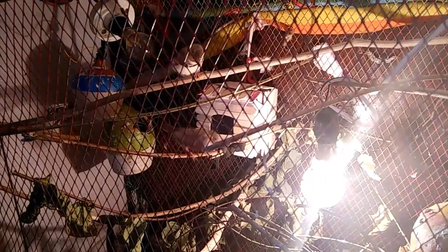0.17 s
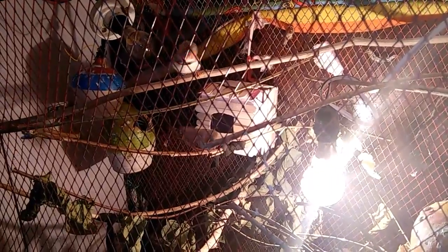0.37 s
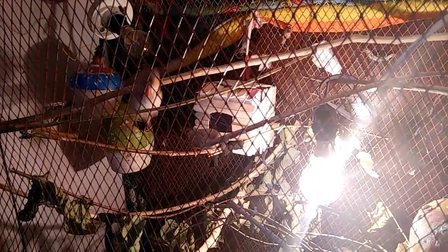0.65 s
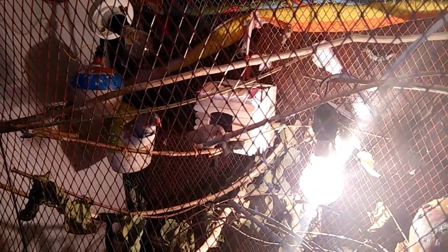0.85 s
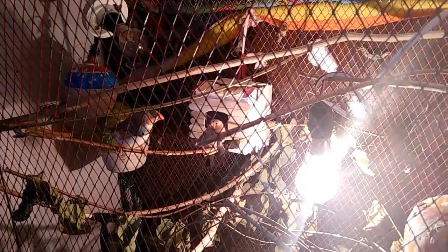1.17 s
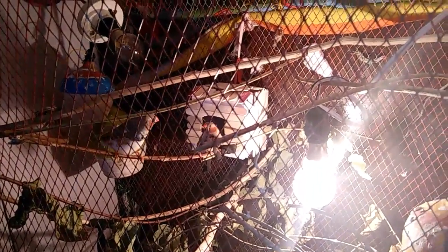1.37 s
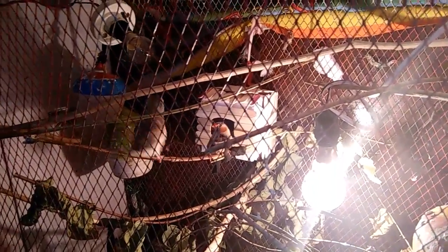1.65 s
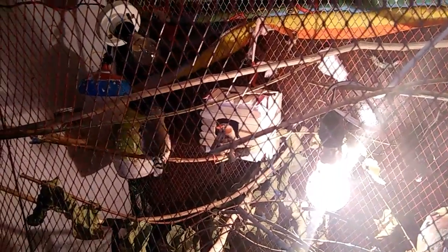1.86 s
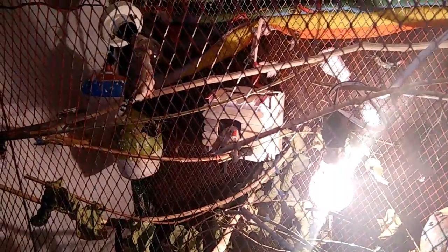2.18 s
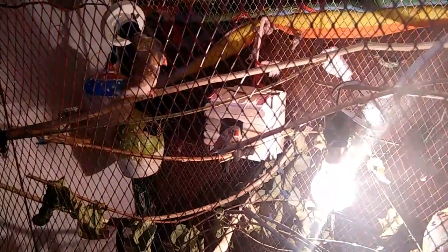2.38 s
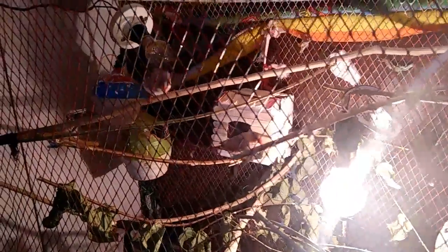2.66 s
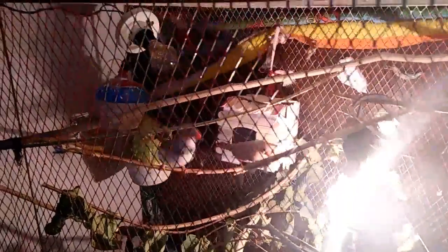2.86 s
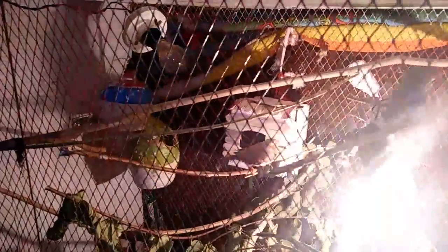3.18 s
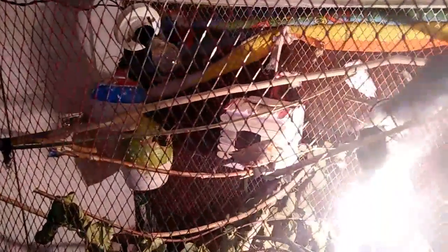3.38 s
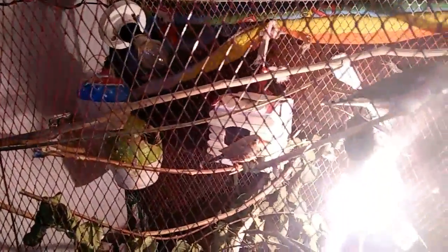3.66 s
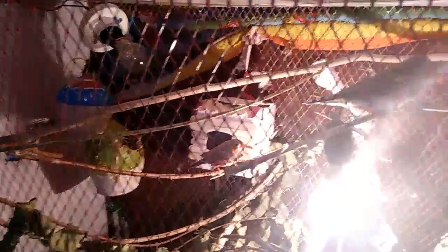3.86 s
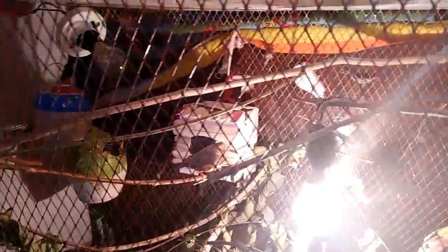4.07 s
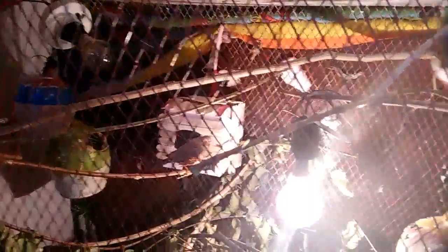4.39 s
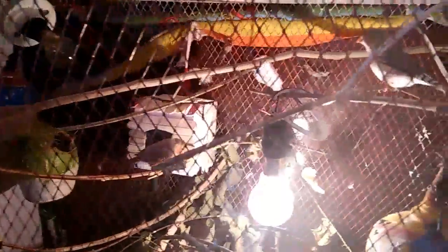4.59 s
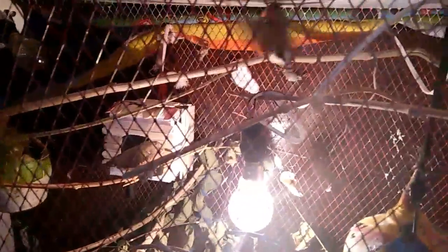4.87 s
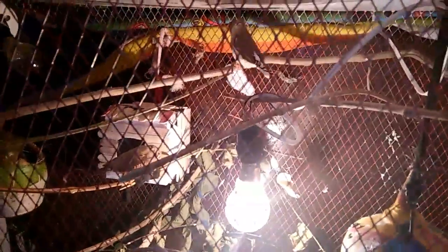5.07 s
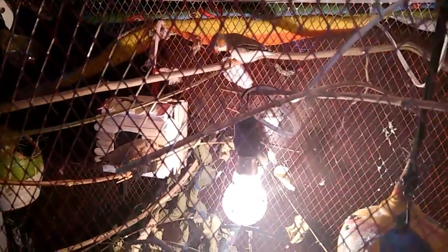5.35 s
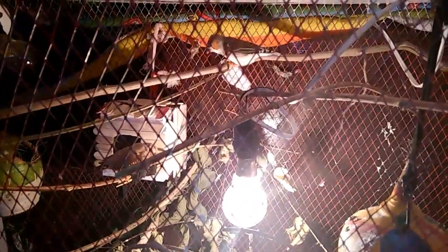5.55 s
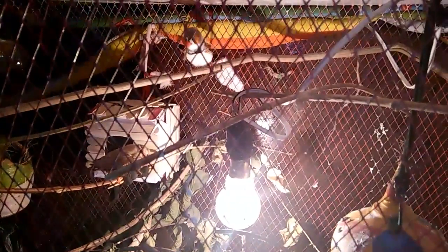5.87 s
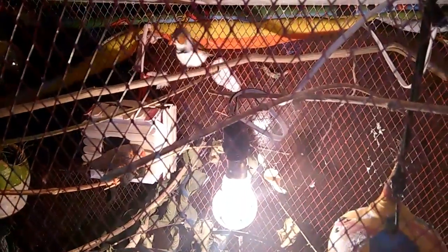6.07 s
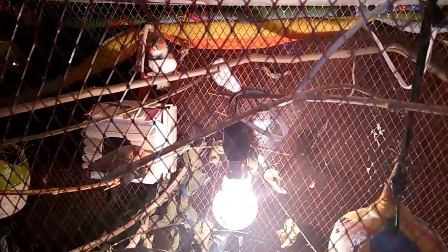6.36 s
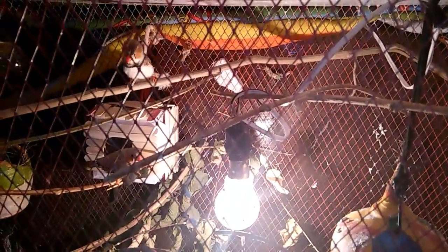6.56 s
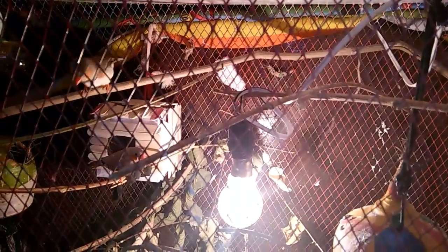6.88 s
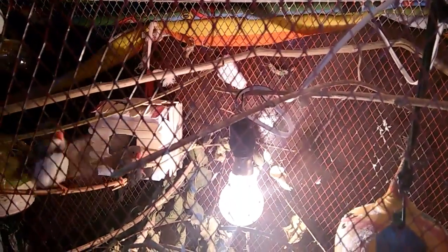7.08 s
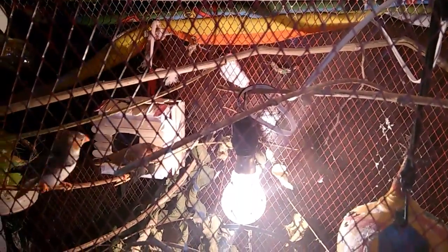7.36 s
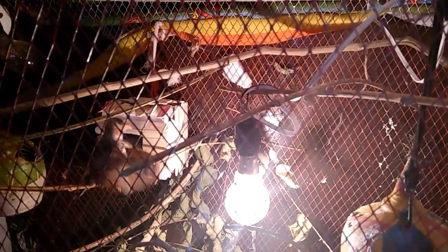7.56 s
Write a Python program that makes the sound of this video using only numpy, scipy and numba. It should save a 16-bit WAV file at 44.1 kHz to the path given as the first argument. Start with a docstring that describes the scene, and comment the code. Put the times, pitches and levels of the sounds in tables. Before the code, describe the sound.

In a small room, a zebra finch in a wire cage sings the same short phrase again and again: a falling nasal note, a sharp chip, a soft raspy buzz. Wings flutter softly between perches, with a light knock on the cage around three seconds. Near the end a run of nasal calls comes before the song resumes. Close, slightly roomy sound over faint hum.

```python
"""The end of a soft buzz and a sharp chip come first, over faint room noise and mains hum.
Zebra finches are in a wire cage in a small room. A male repeats his song (a down-sweep that settles on
a nasal note, a chip, a buzz), with soft peeps and a run of nasal calls. Birds flutter between perches.
Voices are harmonics or rasping noise shaped by a throat resonance. Wings and feathers are filtered noise,
knocks are dying tones with clicks, and the room adds echoes and a short tail."""
import sys
import numpy as np
from scipy import signal
from scipy.fft import rfft, irfft, next_fast_len
from scipy.io import wavfile
from scipy.ndimage import uniform_filter1d
from numba import njit

SR = 44100
rng = np.random.default_rng(int(sys.argv[2]) if len(sys.argv) > 2 else 0)


def wrap_up_sound(samples):
    """Save the sound to the file named by the first command line argument, as 16-bit audio."""
    columns = np.atleast_2d(samples).T
    # keep every value between -1 and 1, then stretch to whole-number steps
    tamed = np.clip(columns, -1, 1)
    steps = np.round(tamed * 32767).astype(np.int16)
    wavfile.write(sys.argv[1], SR, steps)


N = 340893
TIME = np.arange(N) / SR
CUTOFF_HZ = 14350  # nothing much is left above this


def from_db(db):
    """Turn decibels into a plain multiplier."""
    return 10 ** (np.asarray(db) / 20)


def rms_one(x):
    """Scale a sound to an average (rms) strength of 1."""
    return x / np.sqrt(np.mean(x ** 2) + 1e-20)


def add(out, start_s, sound):
    """Mix a sound in at its start time, dropping any part that falls outside."""
    at = round(start_s * SR)
    sound = sound[max(-at, 0):len(out) - at]
    first = max(at, 0)
    out[first:first + len(sound)] += sound


def coloured(x, spectrum):
    """Filter a sound by an outline of (freq_hz, level_db) points."""
    size = next_fast_len(len(x) + 512)
    hz, db = np.transpose(spectrum)
    bins = np.maximum(np.fft.rfftfreq(size, 1 / SR), 1)
    gain = from_db(np.interp(np.log(bins), np.log(hz), db))
    return irfft(rfft(x, size) * gain, size)[:len(x)]


def noise(spectrum):
    """Steady hiss with the given colour and an rms of 1, as long as the scene."""
    return rms_one(coloured(rng.standard_normal(N), spectrum))


def drift(rate, size):
    """Random wander with about `rate` turns a second."""
    turns = rng.standard_normal(size // 32 + 2)
    return np.interp(np.arange(size) * rate / SR, np.arange(len(turns)), turns)


def clock(length):
    """Sample times of a sound of this length in seconds."""
    return np.arange(int(length * SR)) / SR


def envelope(t, length, attack_s, release_s):
    """Smooth attack, hold, smooth release."""
    rise = np.sin(np.pi / 2 * np.clip(t / attack_s, 0, 1))
    fall = np.sin(np.pi / 2 * np.clip((length - t) / release_s, 0, 1))
    return (rise * fall) ** 2


# Colour of the soft room noise; only the shape counts. Columns: freq_hz, level_db
ROOM_NOISE_COLOUR = [(25, -15), (50, 7.5), (90, -2.5), (200, -6), (300, -3), (380, -7), (460, 1), (650, 2),
                     (1250, 2), (1700, -2), (2500, -12), (4000, -26.5), (7000, -28), (14000, -52)]
ROOM_NOISE_DB = -68.5
# Mains hum tones, before their quick, uneven flutter. Columns: freq_hz, level_db (rms)
HUM_TONES = [(50, -72), (100, -79.5), (150, -84.5)]


def background(waver_db=3.0, hum_flutter=1.0, rumble_db=-76, rumble_swell_db=4):
    """Soft room noise, an uneven rumble and a mains hum that flutters quickly and unevenly."""
    hum = sum(from_db(db) * np.sqrt(2) * np.cos(2 * np.pi * hz * TIME) for hz, db in HUM_TONES)
    hum = hum * (1 + hum_flutter * np.tanh(2 * drift(24, N)))
    rumble = noise([(25, -26), (50, 6.0), (140, -1.0), (300, -19.0), (700, -28.0)])
    rumble *= from_db(rumble_db + rumble_swell_db * drift(7.8, N))
    hiss = noise(ROOM_NOISE_COLOUR) * from_db(ROOM_NOISE_DB + waver_db * drift(8.3, N))
    return hiss + hum + rumble


# Early echoes, compared with the direct sound. Columns: delay_s, level_db
EARLY_ECHOES = [(.0016, -21.5), (.0029, -17), (.0047, -13), (.0083, -15.5), (0.0134, -15.5)]
ROOM_T60_S, ROOM_DB = 0.2, -10.5  # time for the tail to fall 60 dB, tail strength


def room(x):
    """Echoes off cage and nearby walls make gliding harmonics swell and fade; a short diffuse tail follows."""
    t = TIME[:SR // 2]
    tail_colour = [(300, 11.5), (1000, 3), (1400, 0), (3000, -3), (5500, -2.5), (9000, -9)]
    tail = coloured(rng.standard_normal(len(t)), tail_colour)
    tail *= from_db(-60 * t / ROOM_T60_S) * np.minimum(t / 0.0012, 1)
    response = from_db(ROOM_DB) * tail / np.sqrt(np.sum(tail ** 2))
    for delay_s, db in EARLY_ECHOES:
        response[round(delay_s * SR)] += from_db(db)
    return x + signal.fftconvolve(x, response)[:N]


# Feet and wing tips hitting perch and wire. Columns: start_s, level_db (of the whole knock)
KNOCK_TIMES = [(3.128, -59), (3.189, -53), (3.23, -58), (3.261, -57), (3.297, -40.5), (4.944, -70)]
# Tones the cage rings with. Columns: pitch_hz, level_db (before a small random change), t60_s
CAGE_TONES = [(740, -15, 0.18), (944, -5, 0.056), (1600, -26, .04), (1654, -9.5, 0.056), (2795, -6, 0.018),
              (5660, -35, .04)]
# Colour of claws clicking on wire; only the shape counts. Columns: freq_hz, level_db
CLICK_COLOUR = [(1000, -9), (5500, 4.5), (9000, -2), (14000, -1)]


def knocks(scratch_db=-4.5):
    """A touch rings the cage in dying tones while claws click on the wire."""
    out, t = np.zeros(N), TIME[:SR // 5]
    for start_s, level_db in KNOCK_TIMES:
        ring = np.zeros(len(t))
        for hz, db, t60_s in CAGE_TONES:
            tone_db = db + 2 * rng.standard_normal() - 60 * t / t60_s
            ring += from_db(tone_db) * np.sin(2 * np.pi * hz * t)
        click = rms_one(coloured(rng.standard_normal(len(t)), CLICK_COLOUR))
        scratch = click * from_db(scratch_db - 60 * t / 0.051)
        add(out, start_s, from_db(level_db) * (ring + scratch))
    return out


# Feather flicks. Columns: start_s, length_s, level_db (at the middle of the flick)
FEATHER_FLICKS = [(0.75, 0.036, -60), (3.817, 0.014, -56), (7.122, 0.032, -60)]
# Colour of feather swish, also heard in flight; only the shape counts. Columns: freq_hz, level_db
SWISH_COLOUR = [(2500, -21), (4300, -7), (5700, 6.5), (7000, -3), (9000, -12), (14000, -24)]


def rustles():
    """A quick flick of the feathers: a short hump of bright hiss."""
    out, swish = np.zeros(N), noise(SWISH_COLOUR)
    for start_s, length, db in FEATHER_FLICKS:
        size = int(length * SR)
        add(out, start_s, from_db(db) * np.hanning(size) * swish[round(start_s * SR):][:size])
    return out


# Flights, levels before fades and wingbeats. Columns: start_s, length_s, wing_level_db, swish_level_db
FLIGHT_TIMES = [(0.833, 0.14, -56.5, -65), (2.992, 0.24, -57, -63.5), (3.193, 0.24, -56, -61),
                (5.05, 0.12, -68, -68.5), (5.148, 0.094, -60, -74), (7.163, 0.19, -55.5, -64)]
TAKE_OFF_S, LANDING_S = 0.05, 0.081
# Colour of the air moved by wings; only the shape counts. Columns: freq_hz, level_db
WING_COLOUR = [(350, -18.5), (600, -16), (780, 3.5), (900, 3.5), (1080, 2), (1350, 2.5), (1700, -2),
               (2100, -7.5), (4000, -28.5), (8000, -43)]
# Puffs of wing draught on the microphone, before wingbeats. Columns: peak_s, length_s, level_db
DRAUGHT_PUFFS = [(2.65, 0.28, -71), (3.245, 0.17, -57), (4.169, 0.18, -67.5), (5.19, 0.21, -68.5)]


def wings(beat_hz=27, beat_db=2.0, feather_grain_db=1.2):
    """Air and feathers rush with every wingbeat; a close pass blows on the microphone."""
    air, swish, out = noise(WING_COLOUR), noise(SWISH_COLOUR), np.zeros(N)
    gust = noise([(25, -26), (60, 1.5), (110, 2.5), (250, -11), (500, -20), (1200, -50)])
    for start_s, length, air_db, swish_db in FLIGHT_TIMES:
        t = clock(length)
        rush = from_db(air_db) * air + from_db(swish_db) * swish
        rush = rush[round(start_s * SR):][:len(t)]
        add(out, start_s, rush * envelope(t, length, TAKE_OFF_S, LANDING_S))
    for peak_s, length, db in DRAUGHT_PUFFS:
        size = int(length * SR)
        puff = from_db(db) * np.hanning(size) * gust[round(peak_s * SR):][:size]
        add(out, peak_s - length / 2, puff)
    wandering_beat_hz = beat_hz * (1 + 0.111 * drift(5.4, N))
    beat = np.sin(2 * np.pi * np.cumsum(wandering_beat_hz) / SR)
    return out * from_db(beat_db * beat + feather_grain_db * drift(300, N))


@njit
def resonate(x, centre, width):
    """Two-pole resonance with a moving centre, gain 1 on top (centre and width in cycles per sample)."""
    y, r = np.zeros(len(x)), np.exp(-np.pi * width)
    for i in range(2, len(x)):
        fresh = (1 - r * r) / 2 * (x[i] - x[i - 2])
        y[i] = fresh + 2 * r * np.cos(2 * np.pi * centre[i]) * y[i - 1] - r * r * y[i - 2]
    return y


# Colour of the voice; only the shape counts. Columns: freq_hz, level_db
VOICE_COLOUR = [(450, -38.5), (700, -16.5), (1000, -8), (1400, -0.5), (1800, -7), (2150, -5), (2850, 5),
                (3750, -2), (4450, -1.5), (5400, 3.5), (6100, -6.5), (7000, -12), (10500, -26),
                (14000, -46)]


def voice(pitch, rough, throat_hz, focus_db, width_hz, jitter, uneven_db=4, rasp_db=3):
    """The syrinx buzzes in harmonics or breaks into rasping chaos; the throat lifts one moving region."""
    size, longest = len(pitch), SR // 5
    rough = np.clip(rough, 0, 1)
    pitch = pitch * (1 + jitter * (rough + 0.06) * drift(499.0, longest)[:size])
    phase = 2 * np.pi * np.cumsum(pitch) / SR
    k = np.arange(1, 27)[:, None]  # harmonic numbers
    unevenness = np.array([drift(21.4, longest)[:size] for _ in k])
    strength = from_db(uneven_db * unevenness) * (k * pitch < CUTOFF_HZ)
    harmonics = np.sum(strength * np.cos(k * phase + k ** 2 / np.pi), axis=0)  # the airway smears each pulse
    tone = harmonics * 2 * np.sqrt(pitch / SR)
    chaos = rng.standard_normal(longest)[:size] * (1 + 0.31 * np.cos(phase))  # air is let through once a cycle
    source = np.sqrt(1 - rough ** 2) * tone + rough * chaos
    throat = resonate(source, throat_hz * np.ones(size) / SR, width_hz / SR)
    sound = coloured(source + from_db(focus_db) * throat, VOICE_COLOUR)
    sound /= np.sqrt(uniform_filter1d(sound ** 2, size=300) + 1e-12)  # even out the loudness
    return sound * from_db(rasp_db * rough * drift(350, longest)[:size])


# Edges of the low, middle and high ranges. Column: freq_hz
RANGE_EDGES_HZ = [900, 2100, 4400, 7500]


def beamed(x, levels_db):
    """Bring the low, middle and high range of a syllable to their levels, with smooth crossings."""
    edges = np.array(RANGE_EDGES_HZ)
    power = 2 * np.abs(rfft(x) / len(x)) ** 2
    range_power = np.histogram(np.fft.rfftfreq(len(x), 1 / SR), edges, weights=power)[0]
    own_db = 10 * np.log10(range_power + 1e-20)
    corners = np.column_stack([edges[:-1] * 1.12, edges[1:] / 1.12]).ravel()
    return coloured(x, np.column_stack([corners, np.repeat(levels_db - own_db, 2)]))


SAG, SAG_S = 0.159, 0.00888  # share of the pitch, time constant


def sag(t, length):
    """Share of the pitch lost as the breath runs out at the end of a note."""
    return SAG * np.exp((t - length) / SAG_S)


SCOOP, SCOOP_S = .22, .01  # share of the pitch, time constant


def call(length, top_hz, throat_hz, rough, edge_rough, attack_s, release_s):
    """An arch of pitch, rougher where it scoops up and sags."""
    t = clock(length)
    droop = SCOOP * np.exp(-t / SCOOP_S) + sag(t, length)
    pitch = top_hz * (1 - droop)
    roughness = rough + edge_rough * droop
    sound = voice(pitch, roughness, throat_hz, focus_db=14, width_hz=1330, jitter=0.023)
    return sound * envelope(t, length, attack_s, release_s)


# Nasal calls, pitch before scoop and sag, levels before the call colour.
# Columns: start_s, length_s, pitch_hz, throat_hz, low_level_db, middle_level_db, high_level_db
NASAL_CALLS = [(6.086, 0.071, 640.4, 5200, -48.5, -53.5, -53), (6.283, 0.14, 721.5, 4460, -49, -40.5, -44),
               (6.446, 0.07, 618.4, 5260, -52, -47, -46), (6.638, 0.14, 716, 4000, -51.5, -40.5, -44.5),
               (6.807, 0.076, 607, 5100, -49.5, -48.5, -48), (6.943, .082, 598, 5300, -49, -57, -52)]
# Soft rasping peeps, pitch and levels as above.
# Columns: start_s, length_s, pitch_hz, low_level_db, middle_level_db, high_level_db
SOFT_PEEPS = [(0.745, 0.036, 756, -59, -67.5, -70), (.982, 0.031, 723, -60, -75, -71.5),
              (2.303, 0.028, 612, -67, -68, -73.5), (2.365, 0.033, 654, -72, -71.5, -77),
              (5.222, 0.029, 634, -66, -69.5, -81), (6.213, .041, 621, -58, -63, -66),
              (6.563, .035, 662, -65, -56, -56.5), (7.021, 0.016, 604, -61, -75, -66),
              (7.08, 0.039, 598, -54.5, -70.5, -58), (7.373, 0.031, 700, -61, -78, -73.5)]
# Calls are more nasal, with a hollow between the two lowest resonances. Columns: freq_hz, level_db
NASAL_COLOUR = [(700, 2), (1400, -0.5), (2150, -1), (2850, 1.5), (3600, -3), (4300, -1.5), (5000, 1.5),
                (6500, -5), (8000, -4.5), (12000, 5.5)]


def calls():
    """Clean harmonic stacks and soft rasping peeps, each with its own length and pitch."""
    out = np.zeros(N)
    for start_s, length, hz, throat_hz, *levels in NASAL_CALLS:
        nasal = call(length, hz, throat_hz, rough=0.054, edge_rough=3.0, attack_s=.017, release_s=0.017)
        add(out, start_s, beamed(nasal, levels))
    for start_s, length, hz, *levels in SOFT_PEEPS:
        peep = call(length, hz, throat_hz=5700, rough=0.68, edge_rough=1.2, attack_s=0.016, release_s=0.0059)
        add(out, start_s, beamed(peep, levels))
    return coloured(out, NASAL_COLOUR)


def slur(length, first_hz, last_hz, glide_s=0.025):
    """A low note that slides down to a purr."""
    t = clock(length)
    pitch = last_hz + (first_hz - last_hz) * np.exp(-t / glide_s)
    sound = voice(pitch, rough=0.23, throat_hz=5040, focus_db=9, width_hz=400, jitter=.02)
    return sound * envelope(t, length, attack_s=0.041, release_s=0.014)


# The buzz is a quick string of falling notes; start_s counts from its own start, level_db is effort.
# Columns: start_s, length_s, first_pitch_hz, last_pitch_hz, level_db, roughness (0-1), throat_hz
FALLING_NOTES = [(-.001, 0.013, 3470, 3170, 4, .25, 6570), (.004, 0.033, 3140, 2640, 8, 0.7, 5530),
                 (0.029, .022, 1514, 890, 4.5, 0.2, 1250), (.037, 0.024, 1000, 687, 8, 0.6, 4700),
                 (.05, .03, 757, 534, 3, 0.39, 3280), (0.066, 0.0325, 619, 568, -4, 0.8, 1480),
                 (0.096, .036, 920, 703, 6, .95, 4100), (0.121, 0.034, 679, 560, -1, 0.7, 4900),
                 (0.136, .045, 602.6, 510.3, 1, 0.23, 1150), (0.152, 0.0221, 623, 531.6, 3.5, 0.18, 5270)]


def buzz(throat_follows=0.48):
    """Soft falling notes run together; the throat sinks a little with each."""
    out = np.zeros(SR // 5)
    for start_s, length, first_hz, last_hz, db, rough, throat_hz in FALLING_NOTES:
        t = clock(length)
        pitch = np.geomspace(first_hz, last_hz, len(t))
        throat = throat_hz * (pitch / pitch.mean()) ** throat_follows
        sound = voice(pitch, rough, throat, focus_db=13.5, width_hz=630, jitter=.05)
        fade = envelope(t, length, attack_s=0.0054, release_s=0.0098)
        add(out, start_s, from_db(db) * sound * fade)
    return out


CHIP_S, CHIP_PEAK_S = 0.035, .011  # length, time of the highest pitch
CHIP_RISE_OCT_PER_S, CHIP_FALL_OCT_PER_S = 30.5, 54
CHIP_ROUGH_START, CHIP_ROUGH_END = 0.17, 0.668
CHIP_THROAT_MULTIPLE = 4.17  # the throat follows the pitch at this multiple


def chip(peak_hz):
    """A sharp up-and-down flick of pitch that breaks up on the way."""
    t = clock(CHIP_S)
    rise = CHIP_RISE_OCT_PER_S * (t - CHIP_PEAK_S)
    fall = CHIP_FALL_OCT_PER_S * (CHIP_PEAK_S - t)
    pitch = peak_hz * 2 ** np.minimum(rise, fall)
    rough = np.linspace(CHIP_ROUGH_START, CHIP_ROUGH_END, len(t))
    sound = voice(pitch, rough, CHIP_THROAT_MULTIPLE * pitch, focus_db=11.5, width_hz=400, jitter=.14)
    return sound * envelope(t, CHIP_S, attack_s=0.011, release_s=0.022)


DIVE_FROM_HZ, DIVE_TOWARDS_HZ, DIVE_S, DIVE_BEND = 1410, 555, .053, 1.8
DIVE_ROUGH, HOLD_ROUGH = 0.22, .06
CROSSING_DB = 3  # swell when a harmonic crosses the throat resonance
# The throat opens as the sweep starts; start_s counts from there. Columns: start_s, throat_hz
THROAT_PATH = [(.014, 1429), (.019, 3734), (.048, 3550), (.083, 3350), (.103, 3900)]


def sweep(length, held_hz):
    """A rough dive from a whistle that settles on a clean nasal note."""
    t = clock(length)
    dive = DIVE_TOWARDS_HZ + (DIVE_FROM_HZ - DIVE_TOWARDS_HZ) * np.exp(-(t / DIVE_S) ** DIVE_BEND)
    pitch = np.maximum(dive, held_hz) * (1 - sag(t, length))
    diving = np.clip((dive - held_hz) / 50, 0, 1)  # 1 in the dive, 0 on the held note
    throat = np.interp(t, *np.transpose(THROAT_PATH))
    swell = from_db(CROSSING_DB * diving * np.cos(2 * np.pi * throat / pitch))
    rough = HOLD_ROUGH + (DIVE_ROUGH - HOLD_ROUGH) * diving
    sound = voice(pitch, rough, throat, focus_db=8, width_hz=370, jitter=0.047)
    return sound * swell * envelope(t, length, attack_s=0.024, release_s=0.015)


# The three levels of each syllable vary because the beak beams differently as the bird turns.
# Sweeps, pitch before the sag, levels before the sweep colour.
# Columns: start_s, length_s, pitch_hz, low_level_db, middle_level_db, high_level_db
SONG_SWEEPS = [(1.048, 0.17, 595, -49, -45, -50), (2.431, 0.17, 589.5, -52, -44.5, -52),
               (3.842, 0.17, 589.6, -48, -41.5, -48.5), (5.284, 0.17, 587.5, -52, -44, -48.5),
               (7.436, 0.17, 591.7, -48, -46.5, -50.5)]
# The sweep is sung with a narrower throat, which mutes its top. Columns: freq_hz, level_db
NARROW_THROAT_COLOUR = [(600, -1.5), (1000, 0.5), (1400, -.5), (1850, -4.5), (2400, -1), (3000, -1),
                        (5500, 1), (7000, -11), (12000, -6.5)]
# Chips, pitch at the peak. Columns: start_s, pitch_hz, low_level_db, middle_level_db, high_level_db
SONG_CHIPS = [(0.06, 1460, -50.5, -54, -55.5), (0.362, 1472, -50.5, -56.5, -56.5),
              (1.238, 1477, -48, -54.5, -49.5), (1.535, 1484, -50, -59, -54.5),
              (1.838, 1485, -52, -58.5, -57.5), (2.624, 1484, -48.5, -54, -51.5),
              (4.037, 1468, -48, -51.5, -47.5), (4.342, 1480, -52, -52, -51.5),
              (4.644, 1535, -50, -51.5, -50.5), (5.477, 1455, -50, -52, -49.5),
              (5.772, 1480, -49.5, -56.5, -55), (7.627, 1486, -47.5, -56.5, -49)]
# Buzzes. Columns: start_s (below 0: already under way), low_level_db, middle_level_db, high_level_db
SONG_BUZZES = [(-0.165, -57.5, -58, -64), (0.134, -60, -66.5, -68), (0.438, -61.5, -66, -66),
               (1.313, -63.5, -63.5, -60.5), (1.611, -67.5, -71, -66.5), (1.915, -66.5, -65, -66.5),
               (2.7, -60, -61, -60.5), (4.115, -62.5, -57.5, -56), (4.423, -69.5, -59.5, -58.5),
               (4.723, -72, -62, -58), (5.552, -66, -62.5, -56.5), (5.852, -60.5, -62.5, -60.5),
               (7.702, -56, -63, -58)]
# A slurred lead-in before one sweep. Values: start_s, length_s, first_pitch_hz, last_pitch_hz,
# low_level_db, middle_level_db, high_level_db
LEAD_IN = (3.725, .115, 1049.5, 439.5, -58, -52.5, -51.5)


def song():
    """The male's song: each syllable is the same learned gesture every time."""
    out = np.zeros(N)
    for start_s, length, held_hz, *levels in SONG_SWEEPS:
        syllable = beamed(sweep(length, held_hz), levels)
        add(out, start_s, coloured(syllable, NARROW_THROAT_COLOUR))
    for start_s, peak_hz, *levels in SONG_CHIPS:
        add(out, start_s, beamed(chip(peak_hz), levels))
    for start_s, *levels in SONG_BUZZES:
        add(out, start_s, beamed(buzz(), levels))
    start_s, length, first_hz, last_hz, *levels = LEAD_IN
    add(out, start_s, beamed(slur(length, first_hz, last_hz), levels))
    return out


def scene(side_hiss_db=-100):
    """Everything sits in the centre; only the top treble has some width."""
    birds = room(song() + calls() + wings() + rustles() + knocks())
    side_colour = [(2500, -82), (4400, -54), (5600, -48), (8000, -11.0), (14000, -1.0)]
    side = coloured(room(np.roll(birds, SR // 500)), side_colour)  # 2 ms late
    side += from_db(side_hiss_db) * noise([(3000, -43), (6000, 34), (14000, -64)])
    return birds + background() + side * np.array([[1], [-1]])  # opposite sign left and right


def record(dry):
    """The top is cut steeply."""
    low_pass = signal.ellip(10, .05, 50, CUTOFF_HZ, fs=SR, output="sos")
    return signal.sosfiltfilt(low_pass, dry)


dry = scene()
out = record(dry)
wrap_up_sound(out)
```